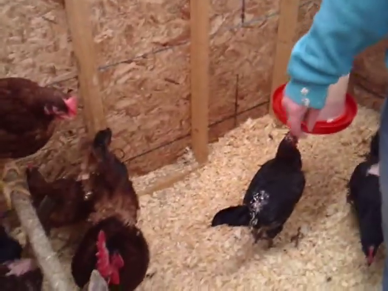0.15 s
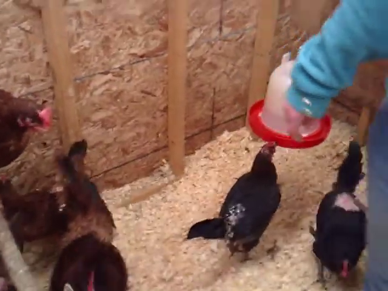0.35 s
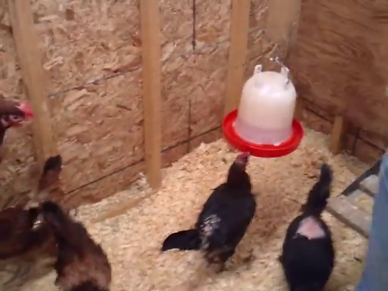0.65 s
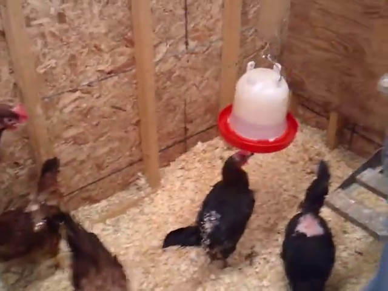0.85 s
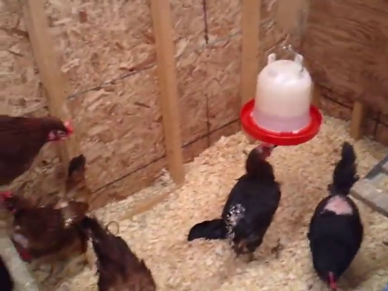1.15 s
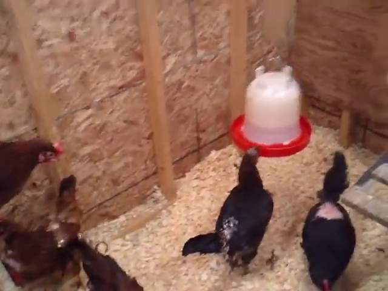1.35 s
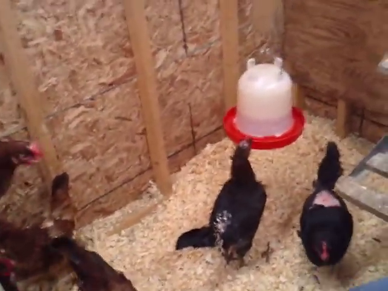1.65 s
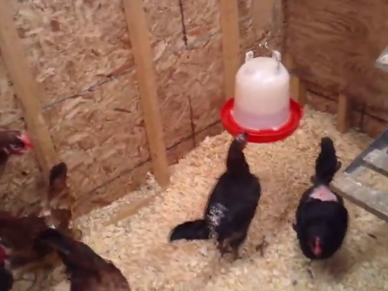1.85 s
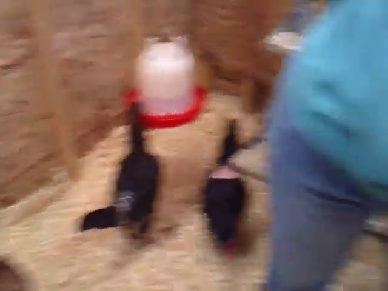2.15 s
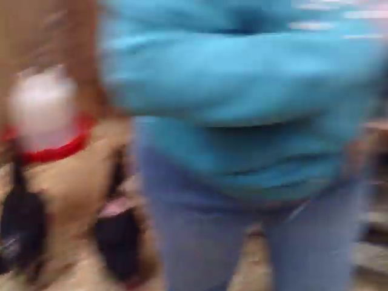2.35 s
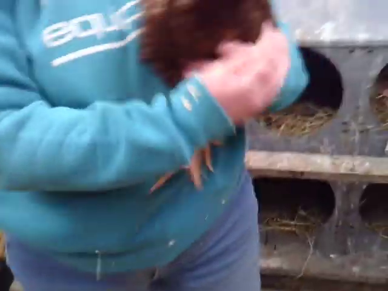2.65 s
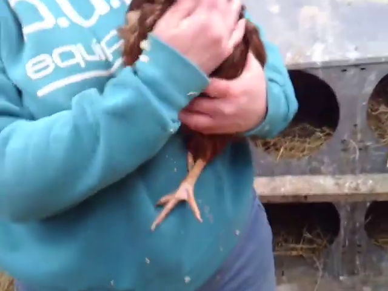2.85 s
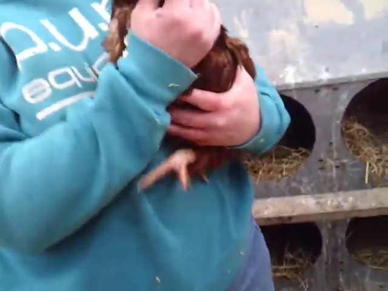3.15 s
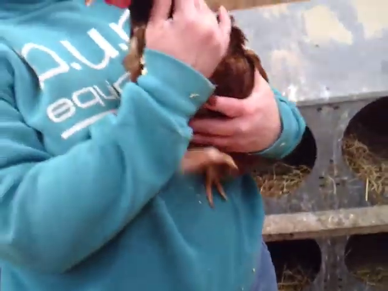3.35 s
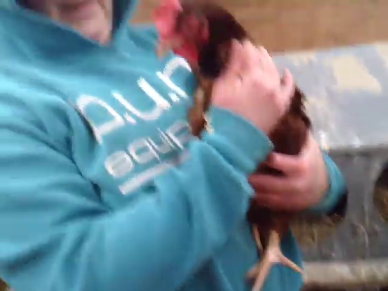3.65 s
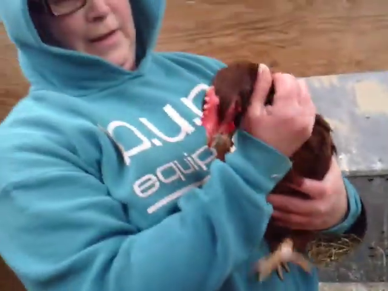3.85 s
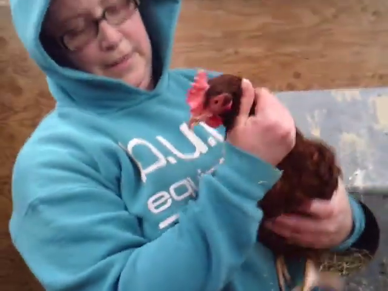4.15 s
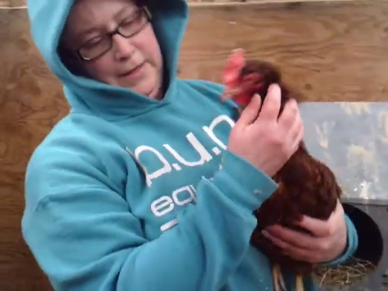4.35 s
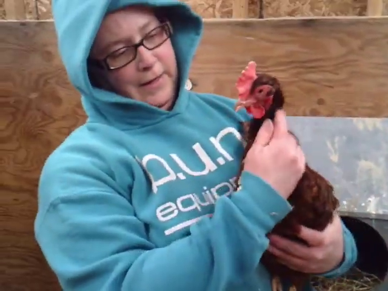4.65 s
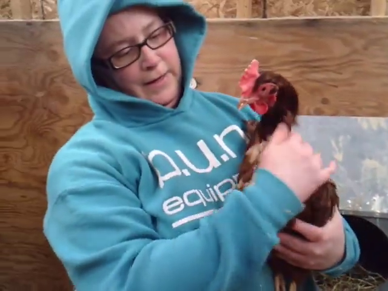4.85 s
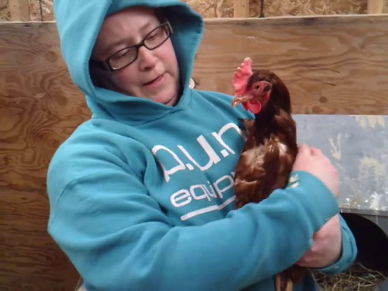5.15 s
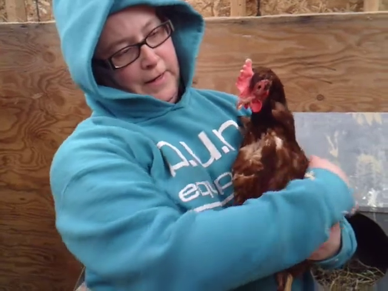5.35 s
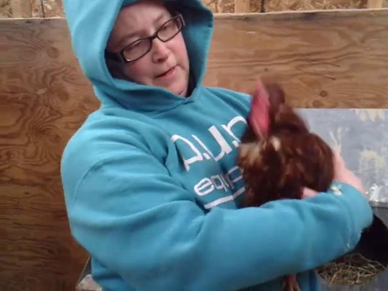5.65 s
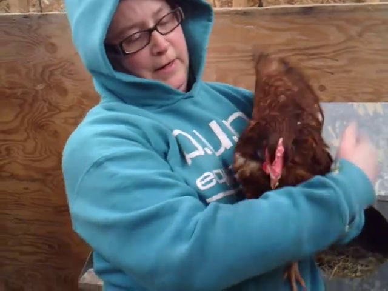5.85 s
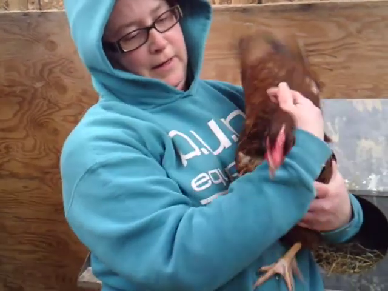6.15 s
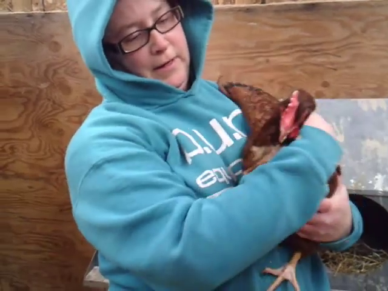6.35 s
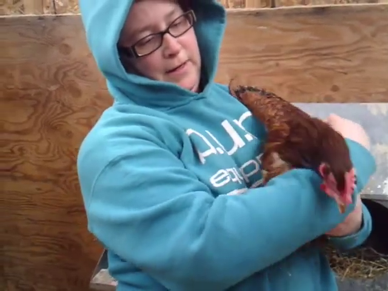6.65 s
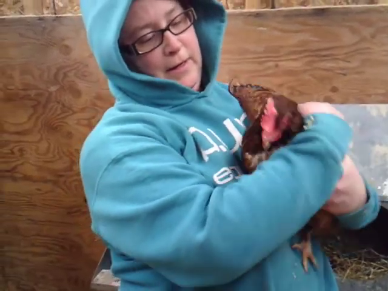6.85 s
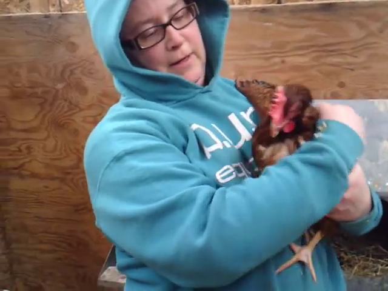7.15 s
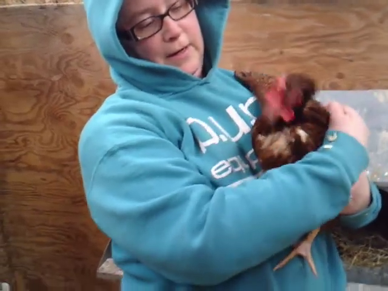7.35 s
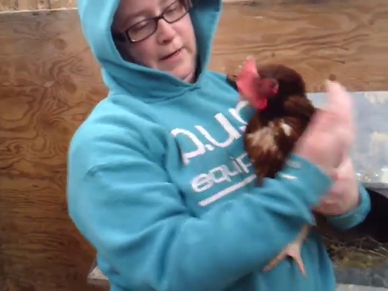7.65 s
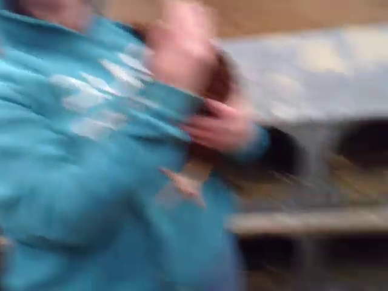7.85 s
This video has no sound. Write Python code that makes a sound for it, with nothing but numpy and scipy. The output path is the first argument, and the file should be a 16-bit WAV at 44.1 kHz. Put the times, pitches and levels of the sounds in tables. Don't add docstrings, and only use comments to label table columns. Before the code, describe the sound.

In a small plywood coop, kicked shavings rustle over a harsh mechanical drone that suddenly drops, before soft murmurs build into sharp, distorted clucks.

```python
import sys
import numpy as np
from scipy import signal
from scipy.fft import rfft, irfft, next_fast_len
from scipy.io import wavfile
from scipy.ndimage import uniform_filter1d, map_coordinates

SR = 44100
rng = np.random.default_rng(int(sys.argv[2]) if len(sys.argv) > 2 else 0)


def output_pcm(signal):
    pcm = np.clip(np.atleast_2d(signal).T, -1, 1) * 32767
    wavfile.write(sys.argv[1], SR, np.round(pcm).astype(np.int16))


def elevation(decibels):
    levels = np.asarray(decibels, float)
    return 10 ** (levels / 20)


N = 352800


def unit(x):
    return x / np.sqrt(np.mean(x ** 2) + 1e-20)


def along(points, hz):
    f, value = np.transpose(points)
    return np.interp(np.log(hz + 1), np.log(f + 1), value)


def filtered(x, response):
    m = 2 * next_fast_len(len(x) // 2 + 4096)
    return irfft(rfft(x, m) * response(np.fft.rfftfreq(m, 1 / SR)), m)[:len(x)]


def peak(f, hz, width):
    return 1j * f * width / (hz * hz - f * f + 1j * f * width)


def wobble(n, rate):
    knots = rng.standard_normal(int(n * rate / SR) + 4)
    return map_coordinates(knots, [np.arange(n) * rate / SR])


def rush(spectrum, patchy_db, gate=1):
    z = signal.stft(gate * rng.standard_normal(N), nperseg=512)[2]
    patches = uniform_filter1d(rng.standard_normal(z.shape), 5, 0)
    patches = unit(uniform_filter1d(patches, 8, 1))
    x = signal.istft(z * elevation(patchy_db * patches), nperseg=512)[1][:N]
    return unit(filtered(x, lambda f: elevation(along(spectrum, f))))


def add(track, s, x):
    i = round(s * SR)
    track[i:i + len(x)] += x[:len(track) - i]


def ring(hz, t60, attack):
    t = np.arange(SR // 4) / SR
    return np.sin(2 * np.pi * hz * t) * elevation(-60 * t / t60) * (1 - np.exp(-t / attack))


def knock(hz, t60, width):
    t = np.arange(SR // 10) / SR
    burst = rng.standard_normal(len(t)) * elevation(-60 * t / t60)
    x = filtered(burst, lambda f: peak(f, hz, width) + 0.0835)
    return x / abs(x).max()


SHUT_S = 1.034
# (time [s], turns per second [1/s])
ENGINE_SPEED = [(0, 27.4), (3, 26), (5.5, 27.6), (8, 24.9)]
# (multiple of speed [1], level open [dB], just shut out [dB], at the end [dB])
HUMS = [(4.04, -51.5, -64, -59.5), (5.16, -43, -57.5, -55.5), (6.12, -62, -60.5, -52.5),
        (7.43, -50.5, -63.5, -54.5), (9.43, -44.5, -52.5, -58), (11.19, -47, -44.5, -53),
        (13.08, -51, -58.5, -49.5), (16.36, -35.5, -51, -56), (18.42, -42.5, -52.5, -47.5),
        (26.1, -47.5, -61.5, -77), (32, -43, -72, -79.5)]
# (frequency [Hz], level [dB])
OPEN_ROAR = [(24, -94), (40, -32), (80, -24.5), (130, -17.5), (216, -11.5), (291, -4), (399, -9),
             (443, -1.5), (635, -15), (928, -8.5), (1390, -17), (1790, -16), (4150, -18.5), (5130, -24),
             (6200, -30), (8060, -92), (13600, -120)]
# (frequency [Hz], level [dB])
WALL_ROAR = [(24, -43), (40, -3), (60, -27), (128, -16), (240, -12.5), (303, 1), (399, -6.5), (648, -2.5),
             (736, -8.5), (1030, -12), (1360, -19.5), (1900, -17.5), (4150, -21), (5240, -23), (6200, -23),
             (8060, -63.5), (13600, -120)]
# (time [s], level [dB])
WALL_ROAR_LEVEL = [(1.06, -40.5), (3.24, -37.5), (4.17, -41), (4.9, -37.5), (5.2, -38.5), (6.57, -42),
                   (8.0, -40)]
# (time [s], level [dB])
CAMERA_TURN = [(1.2, -2), (3.2, -0.42)]


def engine():
    t = np.arange(N) / SR
    speed = np.interp(t, *np.transpose(ENGINE_SPEED)) + 0.0934 * wobble(N, 3)
    turns = np.cumsum(speed) / SR - .5
    shut = np.clip((t - SHUT_S) / .002, 0, 1)
    half_turn, full_turn = 2 * turns % 1, turns % 1

    hums = np.zeros(N)
    for multiple, *levels_db in HUMS:
        level_db = np.interp(t, [SHUT_S, SHUT_S + .002, 8], levels_db) + 0.66 * wobble(N, 8)
        hums += np.sqrt(2) * elevation(level_db) * np.sin(2 * np.pi * (multiple * turns + rng.random()))

    open_db = -28.5
    firing = elevation(-5 * half_turn - 0.72 * full_turn)
    near = elevation(open_db + 0.26 * wobble(N, 13.3)) * rush(OPEN_ROAR, patchy_db=2, gate=firing)

    low_db = np.interp(t, *np.transpose(WALL_ROAR_LEVEL))
    hiss_db = -41.5 + 0.57 * (low_db - low_db.mean()) + np.interp(t, *np.transpose(CAMERA_TURN))
    below_900 = lambda f: 1 / (1 + (f / 900) ** 6)
    low = unit(filtered(rush(WALL_ROAR, patchy_db=-0.5, gate=firing ** 0.33), below_900))
    hiss = unit(filtered(rush(WALL_ROAR, patchy_db=2.0), lambda f: 1 - below_900(f)))
    far = elevation(low_db + 0.43 * wobble(N, 6.8)) * low + elevation(hiss_db + 2) * hiss

    strokes = elevation(-22 * half_turn - 4.3 * full_turn + 5 * wobble(N, 40.2))
    ticking = filtered(strokes * rng.standard_normal(N), lambda f: peak(f, 1600, 1800))
    knocks = elevation(open_db - 11.5) * unit(ticking)
    every_s = .0357
    for s in np.arange(.018, SHUT_S - every_s / 4, every_s):
        late_s, level_db = .002 * rng.normal(), -17 + 2.8 * rng.normal()
        part_hz = 1650 + rng.random() ** 2 * (2900 - 1650)
        add(knocks, s + late_s, elevation(level_db) * knock(part_hz, t60=.035, width=420))
    return hums + (1 - shut) * (near + knocks) + shut * far


# (time [s], peak level [dB], board pitch [Hz])
FOOT_THUDS = [
    (0.626, -25.5, 150),
    (1.032, -28, 250),
    (1.407, -27.5, 160.3),
    (1.743, -26, 146),
    (1.769, -25, 155),
    (7.249, -43, 240),
]


def feet():
    track = np.zeros(N)
    for s, db, hz in FOOT_THUDS:
        add(track, s, elevation(db - 0.5) * ring(hz, t60=0.11, attack=0.0019))
        add(track, s, elevation(db - 5.5) * ring(72, t60=.09, attack=0.0037))
    return track


# (time [s], peak level [dB], pitch [Hz])
CLAW_SNAPS = [
    (1.413, -18, 790),
    (1.452, -13.5, 1090),
    (1.473, -23, 730),
    (2.055, -32, 647),
]


def shavings():
    flakes = rng.random((900, 2))
    places = (flakes[:, 0] * SHUT_S * SR).astype(int)
    ticks = np.bincount(places, elevation(-3.5 * np.log(1.05 - flakes[:, 1])), N)
    ticks = filtered(ticks * elevation(2.1 * wobble(N, 17.0)), lambda f: peak(f, 3100, 3900))
    track = elevation(-36.5) * ticks / np.sqrt(np.mean(ticks[:SR] ** 2))
    for s, db, hz in CLAW_SNAPS:
        add(track, s, elevation(db - 4) * knock(hz, t60=0.04, width=330))
    return track


# (frequency [Hz], time to fade by 60 dB [s])
COOP_ECHO = [(200, 0.21), (1000, 0.17), (2500, 0.11), (6000, 0.096)]


def coop(x, wet_db):
    hz, t, z = signal.stft(rng.standard_normal(SR // 3), SR, nperseg=256)
    fading = elevation(-60 * t / along(COOP_ECHO, hz)[:, None])
    tail = signal.istft(z * fading, SR, nperseg=256)[1]
    answer = elevation(wet_db) * tail / np.linalg.norm(tail)
    answer *= np.clip(np.arange(len(answer)) / SR / .014 - .2, 0, 1)
    answer[0] = 1
    return signal.fftconvolve(x, answer)


def throat(points):
    def response(f):
        cepstrum = irfft(np.log(elevation(along(points, f))))
        cepstrum[1:len(f) - 1] *= 2
        cepstrum[len(f):] = 0
        return np.exp(rfft(cepstrum))
    return response


CALL_COURSE = [
    (0.238, .3),
    (.5, .88),
    (0.779, 1),
    (1, 1),
]


def course(start, length, db, pitch_hz, rest_hz, pull, swell_db):
    first_hz = pitch_hz + pull * (rest_hz - pitch_hz)
    rows = [(start, first_hz, min(-41.5, db - 3))]
    for (share, glide), under_db in zip(CALL_COURSE, swell_db):
        rows.append((start + share * length, first_hz + glide * (pitch_hz - first_hz), db + under_db))
    return rows


# (share of its resonance [1], level [dB])
THROAT_SHAPE = [(0.328, -12.5), (0.501, -12), (.66, -7), (.82, -1.5), (1, 1), (1.331, -8), (1.671, -13),
                (2.5, -12.5)]
# (frequency [Hz], width [Hz], level [dB])
BEAK_RINGS = [(1970, 100, 8.5), (3040, 710, -5), (3950, 435, 0), (5010, 3600, -11.5)]


def cluck(rows, rough, throat_hz, bright_db, top_hz):
    s, pitch, db = np.transpose(rows)
    t = np.arange(round(.15 * SR)) / SR + s[0]
    rough = np.clip(rough, 0, 1)
    jitter = 1 + 0.1078 * rough * wobble(len(t), 246) + 0.017 * wobble(len(t), 73.0)
    turns = np.cumsum(np.interp(t, s, pitch) * jitter) / SR
    k = np.arange(1, 6000 // pitch.max() + 1)[:, None]
    pulses = unit(np.cos(2 * np.pi * (k * turns - .045 * k * k)).sum(0))
    pulses = pulses * elevation(2.2 * rough * wobble(len(t), 300))
    breath = unit(rng.standard_normal(len(t)) * (1 + np.cos(2 * np.pi * turns)))
    source = np.sqrt(1 - rough) * pulses + 1.3 * rough * breath

    swell = np.interp(t, [*s, s[-1] + .006], [*elevation(db / 2), .001])
    effort_db = 40 * np.log10(swell)
    opening = elevation(1.1 * (effort_db - db.max()))
    flow = source * elevation(effort_db) * np.clip((t - s[0]) / .006, 0, 1)

    scaled = [(share * throat_hz, level_db) for share, level_db in THROAT_SHAPE]
    pipe = throat([(60, -58), *scaled, (9000, -65)])

    def wide(f):
        return pipe(f) * (1 + elevation(3) * peak(f, 1850, 500)) / (1 + (f / top_hz) ** 9)

    def closed(f):
        return wide(f) / (1 + 1j * f / 900) ** 2

    def beak(f):
        rings = sum((-1) ** j * elevation(g) * peak(f, c, w) for j, (c, w, g) in enumerate(BEAK_RINGS))
        return rings * peak(f, 3500, 4400)

    low = sum(filtered(flow * part, tract) / np.std(filtered(source, tract))
              for part, tract in ((opening, wide), (1 - opening, closed)))
    airy = (flow + .2 * breath * elevation(effort_db)) * opening
    return low + elevation(bright_db) * filtered(airy, beak) / np.std(filtered(source, beak))


# (start [s], length [s], level [dB], pitch reached [Hz], throat resonance [Hz])
MURMUR_CALLS = [(1.439, 0.044, -25, 370, 820), (1.742, 0.018, -37, 351, 1000), (2.033, 0.04, -23, 309, 620),
                (2.602, 0.046, -23, 317.2, 625), (2.924, 0.049, -24.5, 365.5, 880),
                (3.012, 0.054, -30, 288.3, 880), (3.106, .042, -26.5, 398, 1170),
                (3.17, 0.033, -33.5, 296, 900), (3.466, 0.0546, -23.5, 422, 920)]
# (start [s], length [s], level [dB], pitch reached [Hz], throat resonance [Hz])
CLUCK_CALLS = [(2.338, 0.039, -21.5, 391, 704), (4.246, 0.053, -20, 404, 910),
               (4.705, 0.06, -11.5, 435, 1050), (4.872, 0.033, -11.5, 417.4, 1250),
               (5.18, 0.047, -12, 400, 896), (5.376, 0.049, -12.5, 407.4, 920),
               (5.725, 0.046, -15, 352.5, 956), (5.975, 0.041, -12.5, 369.6, 1130),
               (6.538, .042, -15.5, 339.2, 1020), (6.801, 0.0323, -15.5, 344.2, 1014),
               (7.039, 0.044, -14.5, 346.2, 1085), (7.293, .048, -15, 351, 1030),
               (7.527, 0.048, -15, 370.3, 1130), (7.71, 0.049, -14.5, 404, 1093)]
# (start [s], length [s], level [dB], pitch reached [Hz], throat resonance [Hz])
CACKLE_CALLS = [(3.269, 0.06, -19, 430, 933), (3.645, 0.051, -18.5, 486, 1253),
                (3.858, 0.045, -19, 489.5, 1237), (4.051, 0.05, -21, 440.2, 990),
                (4.365, 0.035, -11.5, 494.4, 1420), (6.085, 0.05, -9, 485.4, 1260),
                (7.837, 0.052, -15, 414.6, 890)]
# (start [s], length [s], level [dB], pitch reached [Hz], throat resonance [Hz])
SQUAWK_CALLS = [(4.482, .036, -12.5, 464.7, 1200), (4.785, 0.044, -10, 489.6, 1296),
                (4.976, 0.057, -6, 480.3, 1353), (5.484, 0.044, -8, 475.4, 1240),
                (6.167, 0.038, -8.5, 476.3, 1430), (6.307, 0.028, -7.5, 457.7, 1310)]
# (rest pitch [Hz], share of the way it starts from rest [0-1])
CALL_KINDS = [
    (290, 0.4),
    (300, .95),
    (405, .95),
    (478, 1),
]
# (level rising [dB], nearly there [dB], at full pitch [dB], at the end [dB])
CALL_SWELLS = [
    (0.5, 0.34, 0.0017, 0.5),
    (-4.5, -1.5, 0.011, -1),
    (-3.5, -1.5, 0.0095, -4.5),
    (-4.5, -1.7, 0, -2),
]
# (time [s], pitch [Hz], level [dB])
LATE_SQUEAK = [(6.277, 970, -36), (6.286, 930, -23), (6.296, 998, -15.5), (6.304, 977, -16.5),
               (6.311, 772, -11.5)]
# (time [s], pitch [Hz], level [dB])
EARLY_SQUEAK = [(4.35, 814, -43), (4.357, 823, -29), (4.363, 827, -24), (4.368, 808, -15.5),
                (4.373, 800, -21)]
# (time [s], beak brightness [dB], roughness [0-1], top of the throat's range [Hz])
BIRD_STATE = [(1.4, -14.5, 0.62, 1280), (2, -18.5, 0.51, 1250), (2.7, -16, 0.3, 1640),
              (2.9, -11.5, 0.05, 1960), (3.12, -10, 0.5, 1690), (3.3, -5, 0.31, 2410),
              (3.899, -9, 0.67, 2030), (4.25, -7.5, .35, 1940), (4.399, -11, 0.49, 2210),
              (4.9, -9.5, 0.5, 2160), (5.001, -12, 0.23, 2240), (5.498, -10, 0.3, 2190),
              (6.001, -17.5, 0.42, 1670), (6.098, -10, 0.55, 2255), (6.331, -10, 0.5, 2320),
              (6.551, -18, 0.46, 1470), (7.55, -18, 0.45, 1460), (7.85, -7, 0.42, 2110)]


def hens():
    track = np.zeros(N)
    calls = []  # rows, throat resonance [Hz], share of roughness, beak level [dB]
    tables = (MURMUR_CALLS, CLUCK_CALLS, CACKLE_CALLS, SQUAWK_CALLS)
    for table, (rest_hz, pull), swell_db in zip(tables, CALL_KINDS, CALL_SWELLS):
        for s, length, db, hz, throat_hz in table:
            calls.append((course(s, length, db, hz, rest_hz, pull, swell_db), throat_hz, 1, 0))
    for rows in (LATE_SQUEAK, EARLY_SQUEAK):
        calls.append((rows, 1500, 0.19, -13))

    when, *state = np.transpose(BIRD_STATE)
    for rows, throat_hz, hoarse, beak_db in calls:
        s, _, db = np.transpose(rows)
        bright_db, rough, top_hz = (np.interp(s[0], when, column) for column in state)
        voice = cluck(rows, hoarse * rough, throat_hz, bright_db + beak_db, top_hz)
        wet_db = np.interp(s[0], [1.4, 3.1, 3.7, 4.4, 8], [-5.5, -0.5, 7.5, -7.5, -5.0])
        call = coop(voice, wet_db)
        t = np.arange(s[0], s[-1], 1 / SR)
        wanted = np.sum(elevation(2 * np.interp(t, s, db)))
        gain = np.sqrt(wanted / np.sum(call[:len(t)] ** 2))
        add(track, s[0], elevation(0.35) * gain * call)
    return track


def scene():
    return (engine() + feet() + shavings() + hens())[None]


def low_pass(x):
    return signal.sosfilt(signal.butter(12, 15750, fs=SR, output="sos"), x)


def record(dry):
    x = filtered(dry[0], lambda f: 1 / (1 + (f / 5500) ** 30) / (1 + (90 / (f + 1)) ** 2))
    x = np.clip(x + .007, -.73, .727)
    return low_pass(x[None])


dry = scene()
out = record(dry)
output_pcm(out)
```